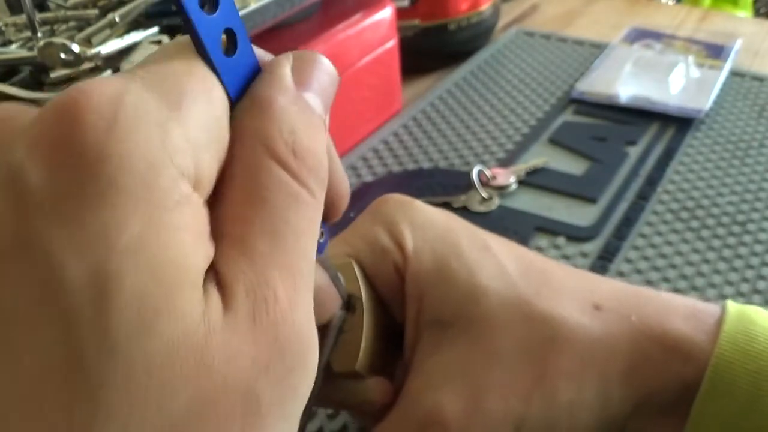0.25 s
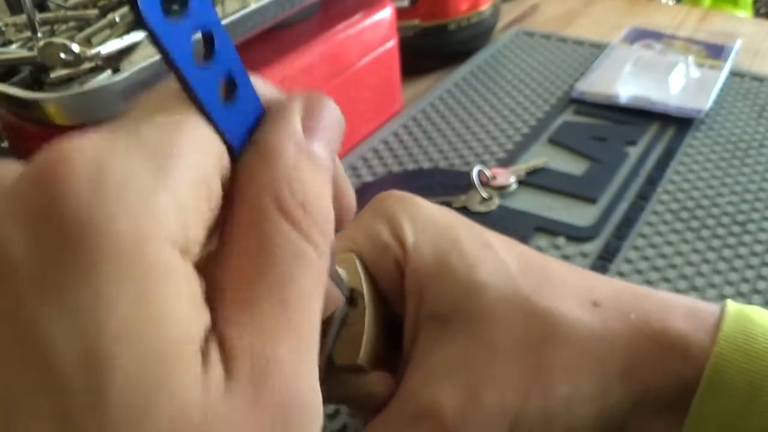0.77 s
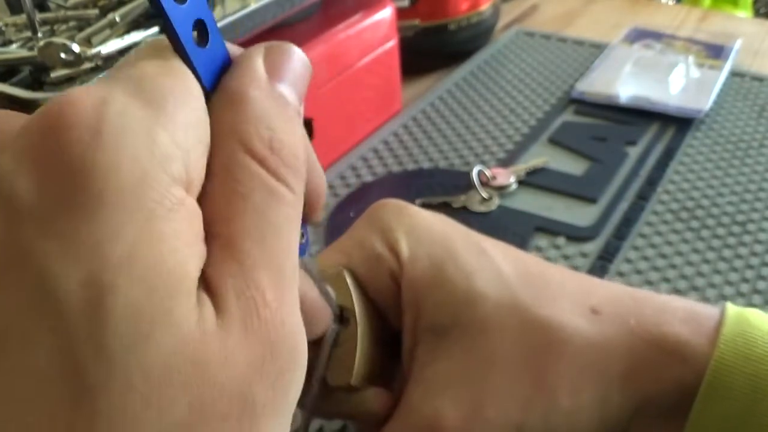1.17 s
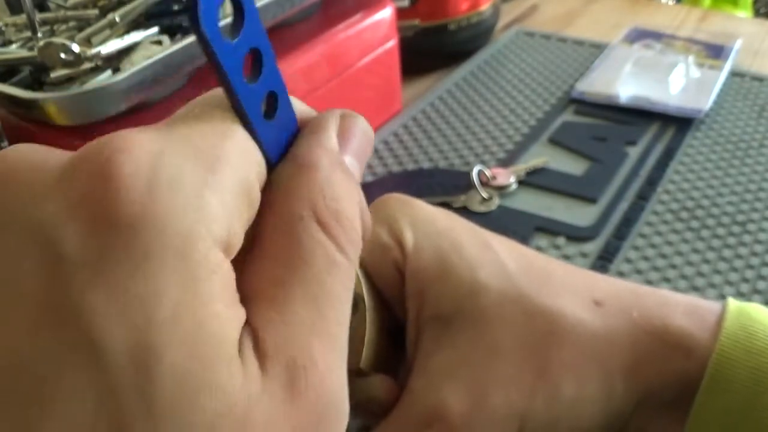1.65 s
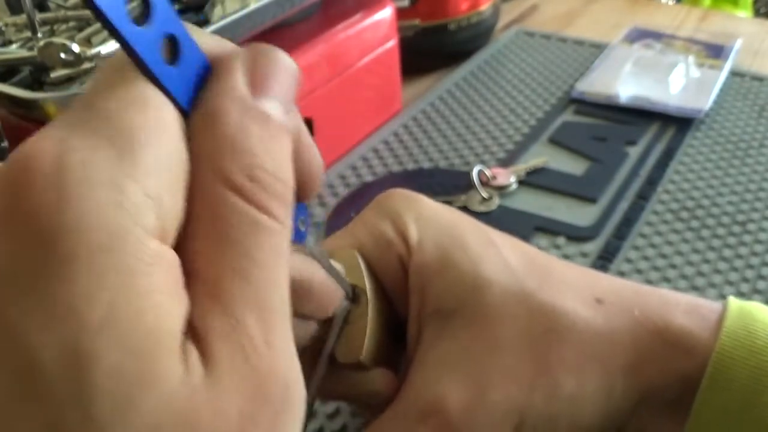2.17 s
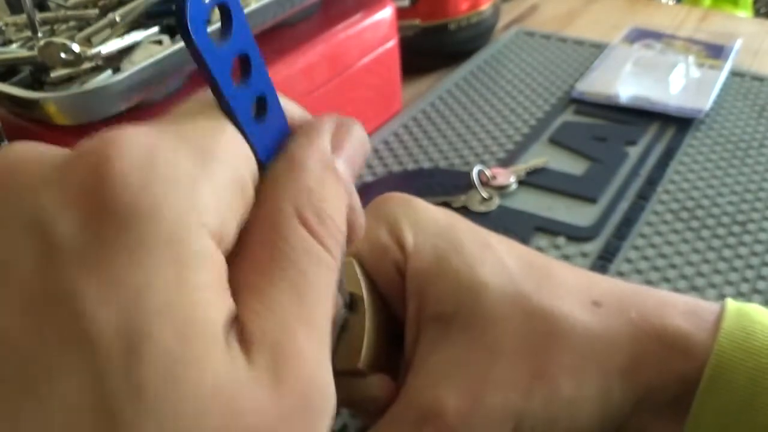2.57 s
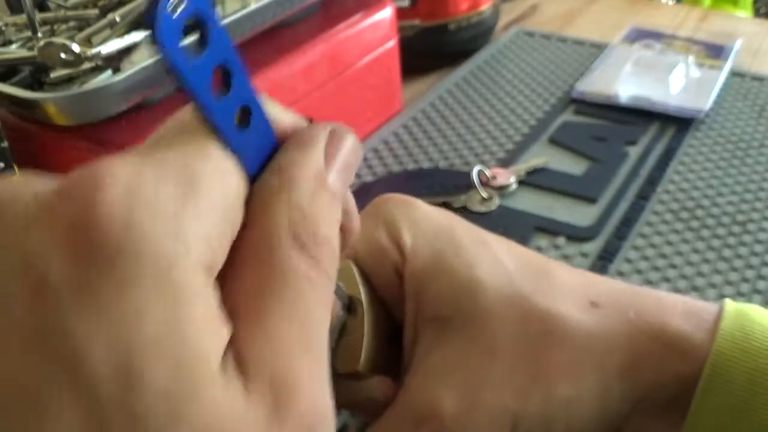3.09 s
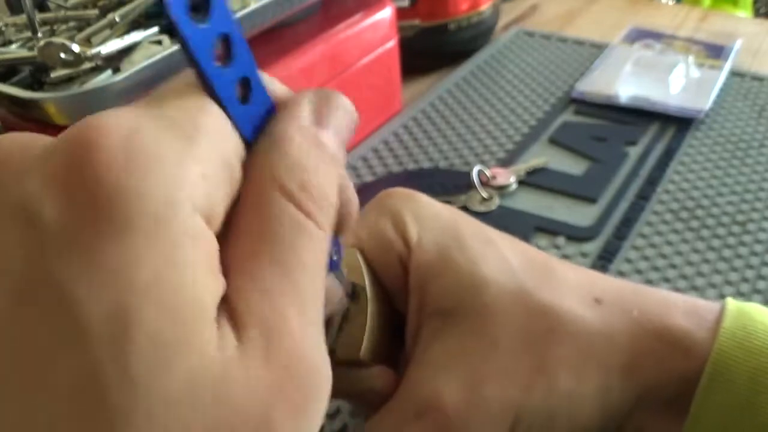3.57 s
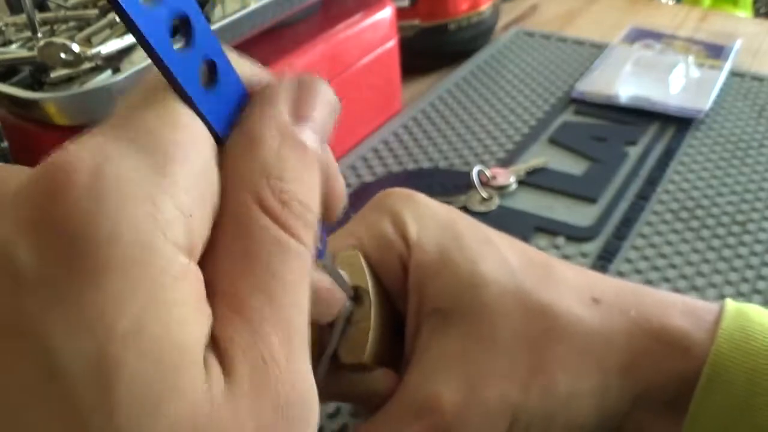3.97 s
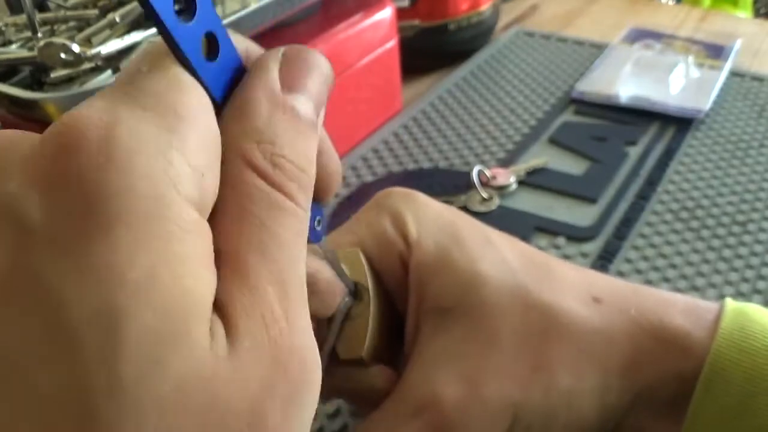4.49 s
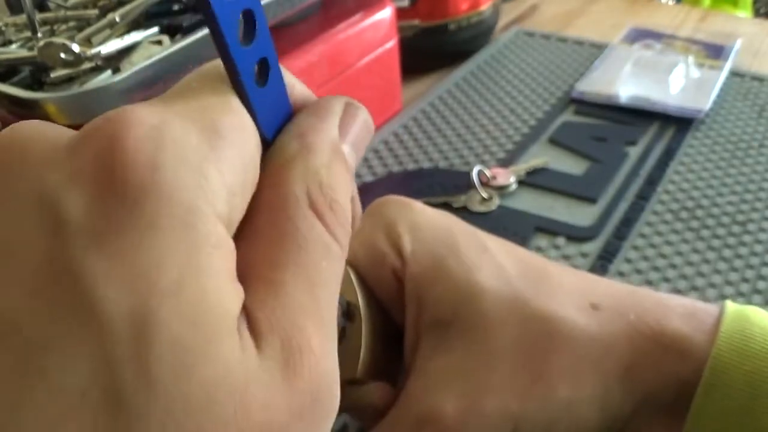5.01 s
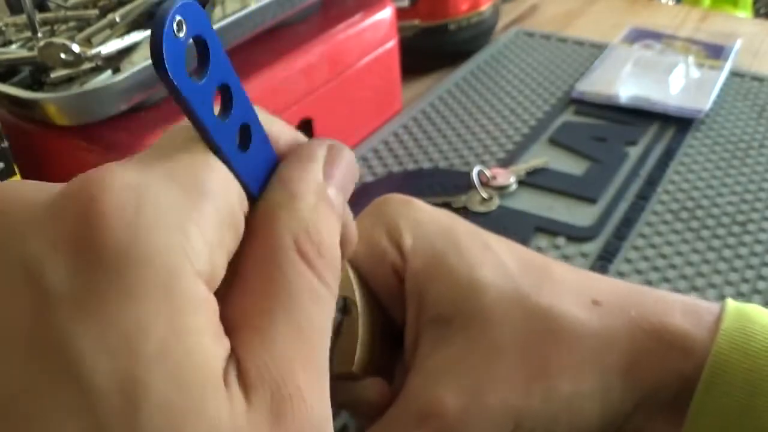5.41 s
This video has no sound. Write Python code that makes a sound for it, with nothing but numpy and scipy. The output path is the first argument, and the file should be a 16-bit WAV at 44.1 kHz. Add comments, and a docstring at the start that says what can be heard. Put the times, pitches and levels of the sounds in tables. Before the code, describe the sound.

Bright, dry metal clicking from a lock being raked, heard close up with a short indoor echo. Snaps come in uneven clusters with tiny gritty rasps between them and dull low bumps through the bench. Gaps open around one and a quarter seconds and just before three; the busiest raking follows, then a pause near five and a few weaker clicks. Quiet low hum and room noise continue beneath.

```python
"""In a small room, over a bench, a steel rake is scrubbed across the pins of a hand-held brass padlock.
Each pin snap excites short damped modes of pins, shell, body and grip, amid a chatter of smaller snaps.
Rasps are trains of tiny slips in the same modes; jolts through the wrists ring low bench modes.
Behind them lie shaped room noise, a machine's wavering harmonic hum and its faint regular ticking.
A decaying spray of echoes answers the lock, and a nearby phone cuts the top of the stereo sound steeply."""
import sys
import numpy as np
from scipy import signal
from scipy.fft import rfft, irfft, next_fast_len
from scipy.io import wavfile
from scipy.ndimage import uniform_filter1d

SR = 44100
rng = np.random.default_rng(int(sys.argv[2]) if len(sys.argv) > 2 else 0)


def pcm_store(signal):
    """Save signal as 16-bit PCM."""
    levels = np.round(np.clip(np.atleast_2d(signal), -1, 1) * 32767)
    wavfile.write(sys.argv[1], SR, levels.astype(np.int16).T)


N = 249165

# Spectral density of the room noise: f/Hz, level/dB per Hz
AIR_SPECTRUM = [(25, -87), (50, -83), (90, -75), (160, -80), (200, -87), (280, -85), (450, -86), (650, -94),
                (1000, -97), (1600, -101), (3200, -102), (4500, -104), (7000, -106), (11000, -109)]
# Partials of the machine hum: f/Hz, central rms level/dB
HUM_PARTIALS = [(33.3, -71), (100, -55), (133.3, -58), (166.7, -62), (266.6, -71), (300, -69), (366.6, -74)]
# Damped modes of one tick: t/s into the tick period, f/Hz, central level/dB, t60/s
TICK_MODES = [(.011, 3500, -58, .028), (.011, 3790, -60, .022), (.012, 2800, -59, .025),
              (.029, 2110, -60, .06)]
# Jolts of the bench: t/s, relative level/dB
BENCH_JOLTS = [(0.112, -44), (0.285, -49.5), (0.532, -48), (0.861, -50), (0.977, -47), (1.155, -44),
               (1.816, -41.5), (1.965, -46), (2.251, -38), (2.375, -42), (2.494, -37), (2.673, -38),
               (3.155, -38), (3.431, -38), (3.754, -34.5), (4.055, -34.5), (4.325, -39.5), (4.485, -39),
               (4.589, -37.5), (4.879, -42)]
# Modes of the bench top: central f/Hz, relative level/dB, t60/s
BENCH_MODES = [(67.8, -3, 0.46), (84.7, 6.5, 0.21), (104, -4.5, 0.12)]
# Rasps of the rake sliding up onto a pin: start t/s, relative level/dB
RAKE_RASPS = [(.091, -39.5), (.258, -51), (.96, -39), (1.474, -57), (1.506, -49.5), (1.768, -52),
              (1.932, -50), (1.971, -48.5), (2.077, -56.5), (2.369, -44.5), (2.626, -45), (3.017, -54.5),
              (3.294, -52.5), (3.331, -48), (3.608, -40), (3.724, -36), (3.89, -46.5), (4.014, -40.5),
              (4.182, -48.5), (4.474, -39.5), (4.612, -35), (4.836, -53.5), (5.367, -47)]
# Pin snaps: t/s, relative level/dB, body knock level/dB relative to the snap
PIN_SNAPS = [(.012, -33, -4), (0.054, -46.5, 1), (0.099, -19, -10.5), (.107, -19.5, -3),
             (0.1323, -11.5, -13.5), (0.269, -22.5, -11.5), (.3012, -24, -20), (.383, -32, -9),
             (0.4734, -17, -32), (0.4806, -12.5, -12), (.5337, -28.5, 2.5), (.57, -14.5, -9.5),
             (0.6848, -20, -12.5), (.73, -18.5, -16.5), (.7888, -39, -4), (0.8015, -29, -13.5),
             (0.8426, -22, -9.5), (0.9221, -21, -17), (0.9729, -15.5, -27), (0.9761, -9.5, -15.5),
             (1.1461, -16, -13.5), (1.154, -13, -18.5), (1.1633, -13.5, -8), (1.4906, -13.5, -27),
             (1.5204, -23, -13), (1.5406, -16.5, -16.5), (1.566, -49, 9.5), (1.669, -48.5, -4),
             (1.75, -48.5, 5), (1.785, -16.5, -13), (1.7921, -10.5, -24), (1.801, -10, -15.5),
             (1.8414, -21, -16.5), (1.8614, -34, -9), (1.9252, -20.5, -28), (1.948, -26, -21),
             (1.9685, -20, -17.5), (1.991, -27, -7.5), (2.0943, -19.5, -15), (2.1017, -14, -28),
             (2.1296, -19, -18.5), (2.2212, -15.5, -15.5), (2.238, -11, -17), (2.2491, -13, -17.5),
             (2.2559, -14.5, -13), (2.2668, -17, -4), (2.381, -11.5, -11.5), (2.3925, -15.5, -15),
             (2.4098, -21, -11.5), (2.432, -30, -12), (2.4756, -13, -20), (2.4981, -25.5, -1),
             (2.5186, -12.5, -13.5), (2.5246, -12, -11), (2.5367, -12, -21), (2.637, -21.5, -11.5),
             (2.6747, -16, -11), (2.68, -12.5, -22), (2.7412, -23.5, -18), (2.757, -17, -8.5),
             (2.9482, -49, -5), (3.037, -28, -5), (3.1521, -11, -15), (3.2146, -37.5, -11),
             (3.3114, -26.5, -19), (3.321, -21.5, -19.5), (3.3453, -21, -25), (3.3961, -26.5, -13),
             (3.407, -31.5, -8), (3.4202, -16.5, -15.5), (3.4339, -21.5, -7), (3.4396, -10.5, -14),
             (3.4532, -15, -7), (3.5642, -42, -4.5), (3.6175, -10.5, -16), (3.6262, -16, -12.5),
             (3.6338, -19, -22), (3.646, -26, -21.5), (3.6742, -26.5, -21), (3.705, -29, -14),
             (3.7095, -24, -8.5), (3.73, -13, -27), (3.74, -12, -15.5), (3.743, -14, -10.5),
             (3.7545, -22, -10), (3.7558, -7.5, -12), (3.917, -12.5, -13), (3.923, -14.5, -35),
             (3.9298, -24.5, -14), (3.9886, -28, -21), (3.9946, -21, -19), (4.0246, -8.5, -20),
             (4.0317, -15, -11), (4.048, -10, -13.5), (4.0505, -15.5, -3), (4.195, -17, -14.5),
             (4.2034, -15, -8.5), (4.221, -24, -16), (4.2339, -28, -13), (4.2594, -19.5, -20),
             (4.272, -16.5, -14.5), (4.2833, -29.5, -7), (4.3006, -16, -5), (4.3177, -10.5, -10),
             (4.328, -34.5, 12), (4.4549, -28, -10), (4.4877, -14.5, -24), (4.4934, -16, -18),
             (4.499, -19, -23), (4.5223, -25.5, -8), (4.5673, -13.5, -16), (4.5825, -10.5, -10),
             (4.618, -14, -8.5), (4.6223, -11.5, -24.5), (4.631, -22, 2.5), (4.7153, -10.5, -25.5),
             (4.7458, -15.5, -17.5), (4.758, -14.5, -13), (4.7688, -20.5, -13.5), (4.7788, -17.5, -15.5),
             (4.802, -24, -13), (4.849, -24, -9.5), (4.8671, -16, -2.5), (4.89, -26, -5),
             (5.1776, -49, 15.5), (5.2625, -27.5, -2), (5.2791, -32, -1), (5.2992, -29, -11),
             (5.3856, -26, -15), (5.394, -20.5, -19), (5.4009, -18.5, -11.5), (5.4206, -26, -7)]
# Modes of the lock: central f/Hz, relative level/dB, t60/s of a full snap,
# part (rounded: 0 body, 1 shell, 2 pins, 3 grip)
LOCK_MODES = [(410, -7.5, 0.0096, 3), (676, -13.5, 0.015, 3), (940, 5, 0.0088, 3), (1983, 2, 0.014, 0),
              (2547, 2.5, 0.017, 0), (3707, 9, 0.0059, 0), (4720, 0, 0.0066, 1.5), (5403, 5, 0.007, 1),
              (6710, 3.5, 0.0081, 1), (8293, 8.5, 0.0061, 2), (8880, 4, 0.008, 2), (9584, 2.5, 0.0068, 2),
              (10180, 7, 0.0063, 2), (10920, 2, 0.0095, 2)]

TICK_HZ = 24.99
ROOM_T60_S, ROOM_DB, ROOM_LOWPASS_HZ = 0.18, -17.5, 6000
RASP_S = 0.013
# shell level relative to the snap at -15 dB, its change per dB of snap, and its random spread
SHELL_DB, SHELL_DB_PER_DB, SHELL_SCATTER_DB = -9, -.25, 1.5
TOP_HZ = 10950


def undb(db):
    """An amplitude ratio is ten to the power of its level in dB over twenty."""
    return 10 ** (np.asarray(db) / 20)


def decay(t, t60):
    """Exponential damping lowers the amplitude by 60 dB in each t60."""
    return np.exp(-np.log(1000) * t / t60)


def ring(when, gains, hz, t60, rise_s, spread, size):
    """Modal superposition: each blow excites damped sines, slightly detuned, through a short push."""
    t = np.arange(size) / SR
    modes = len(hz)
    chance = rng.standard_normal((len(when), 2 * modes))
    out = np.zeros(N + size)
    envelope = decay(t, np.array(t60)[:, None]) * (1 - np.exp(-t / rise_s))
    for s, gain, c in zip(when, gains, chance):
        pitch = np.array(hz) * (1 + spread * c[:modes])
        phase = np.pi * c[modes:, None]
        waves = np.sin(2 * np.pi * pitch[:, None] * t + phase)
        i = int(np.clip(s * SR, 0, N - 1))
        out[i:i + size] += gain @ (envelope * waves)
    return out[:N]


def walk(rate):
    """Twice-averaged random steps form a slow wander, scaled to unit standard deviation."""
    k = int(SR / rate)
    steps = np.repeat(rng.standard_normal(N // k + 1), k)
    smooth = uniform_filter1d(uniform_filter1d(steps, k), k)[:N]
    return smooth / smooth.std()


def air():
    """Spectrally shaped noise whose two channels are coherent in the bass and less so in the treble."""
    size = next_fast_len(N)
    f = np.maximum(np.arange(size // 2 + 1) * SR / size, 1)
    table_hz, table_db = np.transpose(AIR_SPECTRUM)
    level_db = np.interp(np.log(f), np.log(table_hz), table_db)
    shape = np.sqrt(SR / 2) * undb(level_db)  # density per Hz to white-noise gain
    apart = np.clip(f / 900, .09, .6)
    mid = irfft(rfft(rng.standard_normal(size)) * shape, size)[:N]
    side = irfft(rfft(rng.standard_normal(size)) * shape * apart, size)[:N]
    return mid + np.outer([1, -1], side)


def machine():
    """Rotation gives a hum near multiples of one shaft rate; a periodic impulse rings damped tick modes."""
    t = np.arange(N) / SR
    out = np.zeros(N)
    for hz, db in HUM_PARTIALS:
        amplitude = np.sqrt(2) * undb(db + 2.7 * walk(6.2))  # rms to peak
        out += amplitude * np.sin(2 * np.pi * (hz * t + rng.random()))
    for at, hz, db, t60 in TICK_MODES:
        age = (t - at) % (1 / TICK_HZ)
        envelope = decay(age, t60) * (1 - np.exp(-age / .001))
        out += undb(db + 2 * walk(12)) * envelope * np.sin(2 * np.pi * hz * age)
    return out


def bench():
    """Low modes with a slow push: the wrists jolt the bench top, which booms low and late."""
    s, db = np.transpose(BENCH_JOLTS)
    hz, mode_db, t60 = np.transpose(BENCH_MODES)
    gains = undb(db[:, None] + mode_db + 1)
    return ring(s, gains, hz, t60, rise_s=0.013, spread=0.07, size=12000)


def room(x):
    """Reverberation is convolution with dull, decaying noise, independent in the two channels."""
    t = np.arange(int(.4 * SR)) / SR
    onset = np.clip(t / 0.0082 - .5, 0, 1)
    tail = rng.standard_normal((2, len(t))) * decay(t, ROOM_T60_S) * onset
    tail = signal.lfilter(*signal.butter(1, ROOM_LOWPASS_HZ, fs=SR), tail)
    energy = (tail ** 2).sum(axis=1, keepdims=True)
    tail = undb(ROOM_DB) * tail / np.sqrt(energy)
    return signal.fftconvolve(x[None], tail, axes=1)[:, :N]


def rasp(count=24):
    """Stick-slip: tiny slips of steel on brass swell as the rake bites, and barely stir the body."""
    s, db = np.transpose(RAKE_RASPS)
    hz, mode_db, t60, part = np.transpose(LOCK_MODES)
    along = rng.random((len(s), count))  # fraction of the rasp
    slip_db = db[:, None] - 9.0 + 6 * along + rng.uniform(-1.7, 10, along.shape)
    part_db = np.array([-11.5, -1.5, -3, -9.5])[np.round(part).astype(int)]
    colour_db = rng.uniform(-7, 7, along.shape + (len(hz),))
    gains = undb(slip_db[..., None] + mode_db + part_db + colour_db).reshape(-1, len(hz))
    when = (s[:, None] + along * RASP_S).ravel()
    return ring(when, gains, hz, t60, rise_s=0.00026, spread=0.048, size=350)


def snap_gains():
    """Energy sharing: each contact point divides a snap differently among the modes of a part."""
    s, db, body_db = np.transpose(PIN_SNAPS)
    hz, mode_db, t60, part = np.transpose(LOCK_MODES)
    part = np.round(part).astype(int)
    # harder snaps favour the pins over the shell, and shake the grip more
    scatter_db = SHELL_SCATTER_DB * rng.standard_normal(len(s))
    shell_db = SHELL_DB + SHELL_DB_PER_DB * (db + 15) + scatter_db
    grip_db = body_db - 7 + .3 * (db + 15)
    pins_db = np.full_like(db, -7)
    part_db = np.array([body_db - 5.5, shell_db, pins_db, grip_db]).T[:, part]
    # random shares with unit mean square within each part
    share = undb(4.0 * rng.standard_normal((len(s), len(hz))))
    same = part[:, None] == part
    mean_square = share ** 2 @ same / same.sum(axis=0)
    share = share / np.sqrt(mean_square)
    return share * undb(db[:, None] + part_db + mode_db)


def chatter(s, gains, hz, t60, count):
    """Repeated small impacts of pins, springs and dragging rake cluster around each snap and die away."""
    # between close pins the rake keeps scraping; after a lone snap the chatter dies fast
    dragging = np.append(np.diff(s), 1)[:, None] < .02
    late = rng.uniform(-0.0046, 0.014, (len(s), count))  # s after the snap
    fall_db_per_s = np.where(dragging, 500, 1400)
    fall_db = np.where(late < 0, 4500 * late, -late * fall_db_per_s)
    small_db = -15.5 + fall_db + rng.uniform(-16.0, 8.0, late.shape)
    colour_db = rng.uniform(-7, 7, late.shape + (len(hz),))
    small = gains[:, None] * undb(small_db[..., None] + colour_db)
    when = (s[:, None] + late).ravel()
    return ring(when, small.reshape(-1, len(hz)), hz, 0.7 * t60, rise_s=0.0001, spread=0.072, size=350)


def lock(count=24):
    """Impulsive excitation: pin snaps ring the lock's modes inside a dense chatter."""
    s = np.transpose(PIN_SNAPS)[0]
    hz, _, t60, _ = np.transpose(LOCK_MODES)
    gains = snap_gains()
    snaps = ring(s, gains, hz, t60, rise_s=.00035, spread=.07, size=800)
    return snaps + chatter(s, gains, hz, t60, count)


def scene():
    """Superposition: filtered and delayed lock sound sets its stereo lean; the background leans right."""
    background = undb([[-.3], [.3]]) * (bench() + machine() + air())
    near = lock() + rasp()
    dull = signal.lfilter(*signal.butter(2, 3000, fs=SR), near)
    delayed = np.roll(near, 9)  # 9 samples
    side = 0.019 * near - 0.091 * dull + 0.11 * delayed
    return background + room(near) + near + np.outer([1, -1], side)


def record(dry):
    """Band limiting: two steep low-pass filters in the phone cut the top."""
    cut = signal.sosfilt(signal.cheby1(10, .5, TOP_HZ, fs=SR, output="sos"), dry)
    return signal.sosfilt(signal.ellip(6, .2, 30, 12200, fs=SR, output="sos"), cut)


dry = scene()
out = record(dry)
pcm_store(out)
```